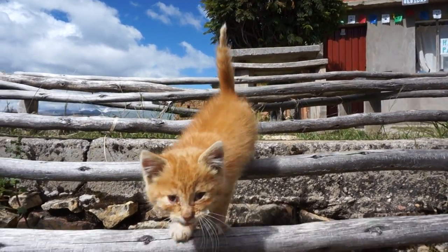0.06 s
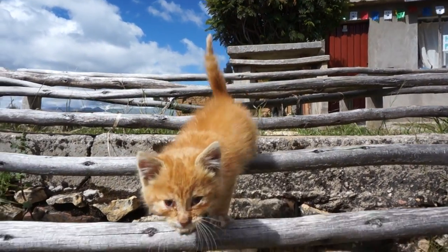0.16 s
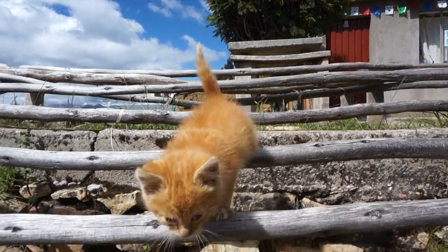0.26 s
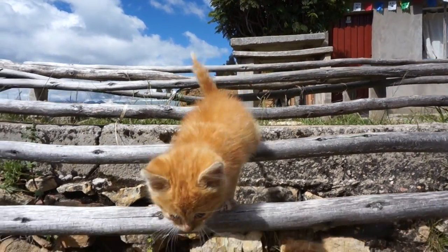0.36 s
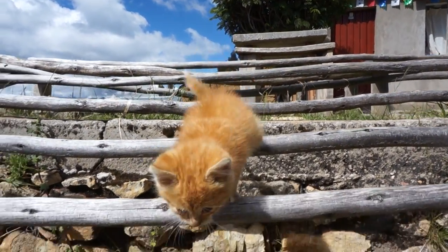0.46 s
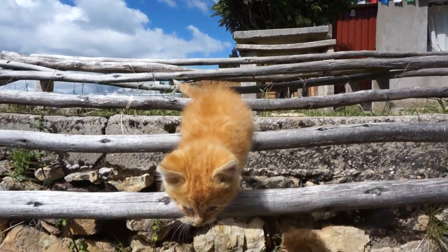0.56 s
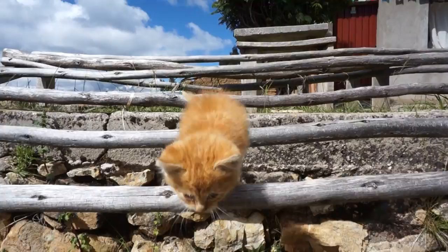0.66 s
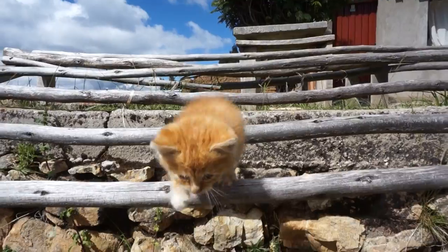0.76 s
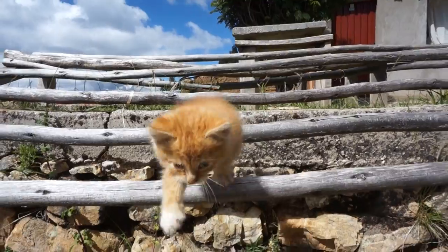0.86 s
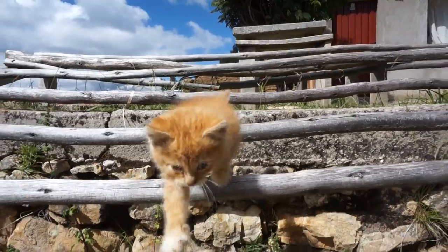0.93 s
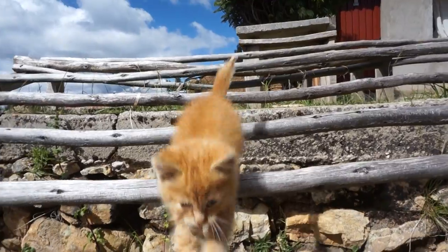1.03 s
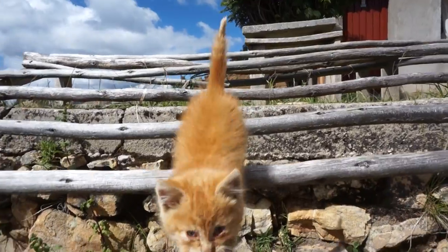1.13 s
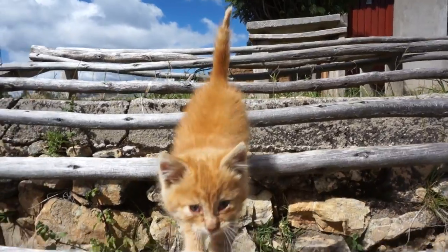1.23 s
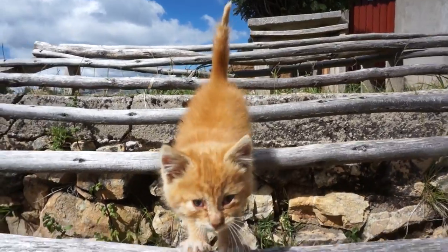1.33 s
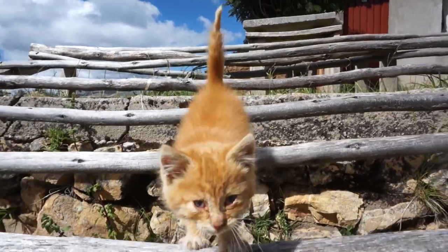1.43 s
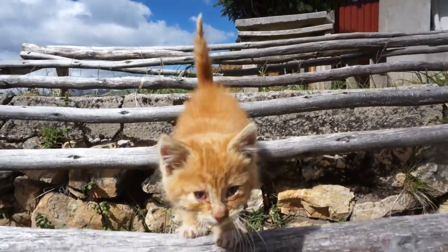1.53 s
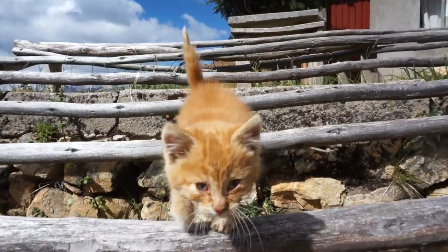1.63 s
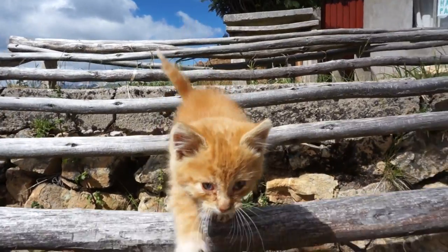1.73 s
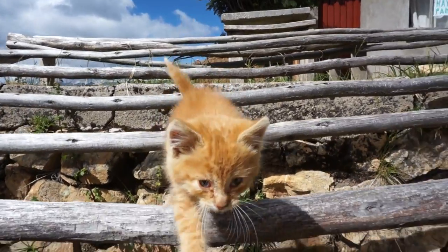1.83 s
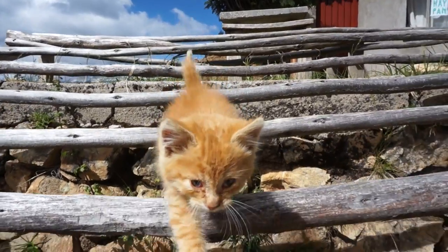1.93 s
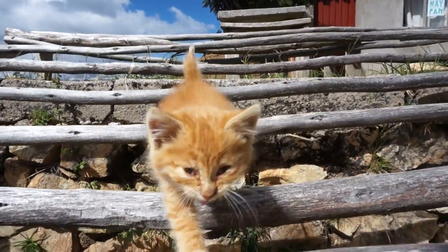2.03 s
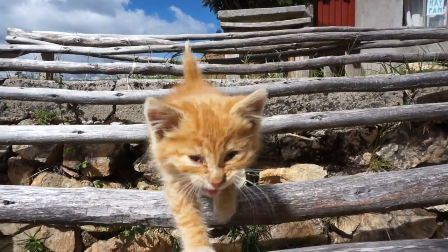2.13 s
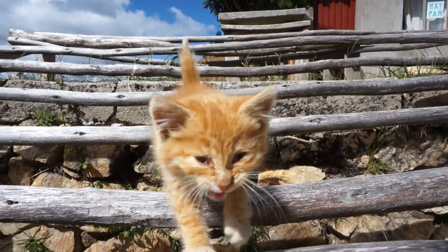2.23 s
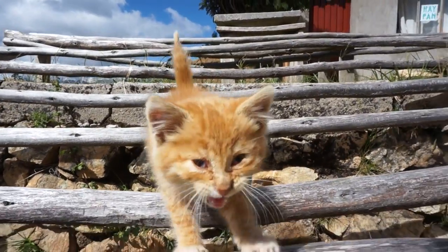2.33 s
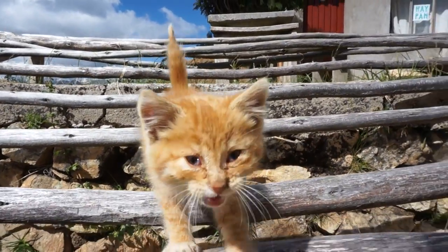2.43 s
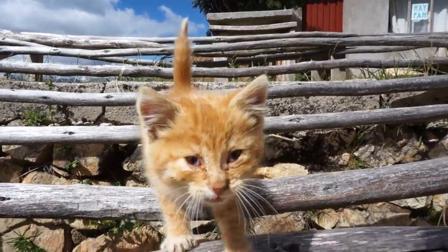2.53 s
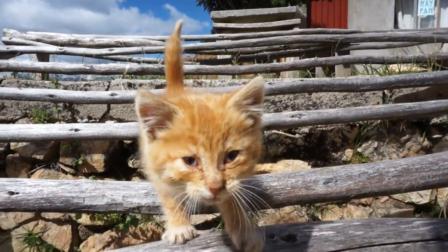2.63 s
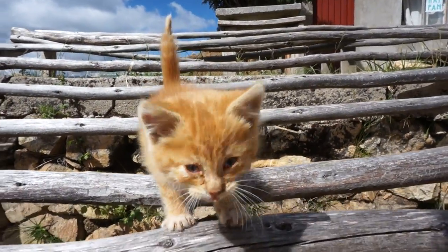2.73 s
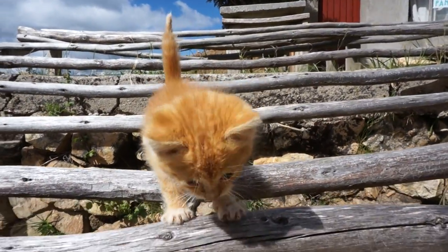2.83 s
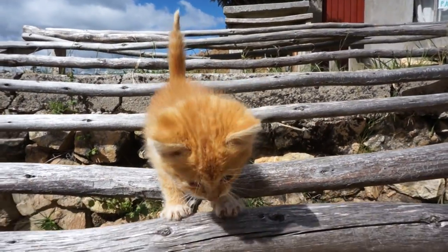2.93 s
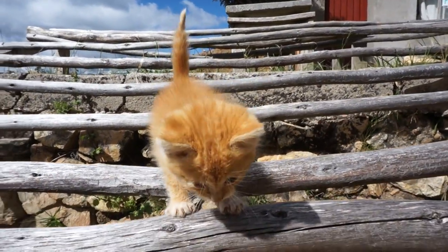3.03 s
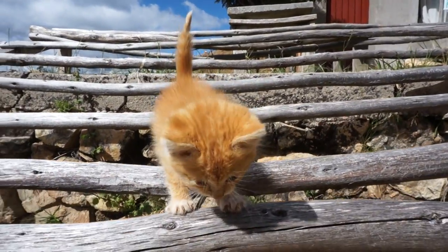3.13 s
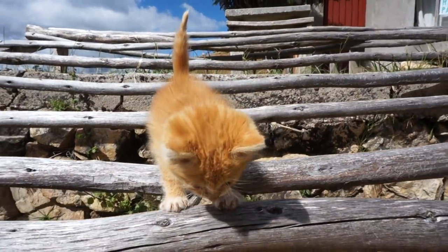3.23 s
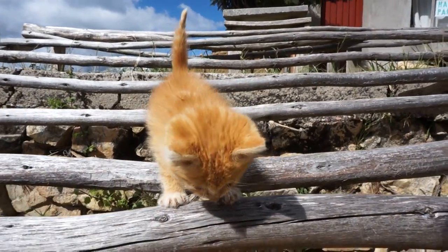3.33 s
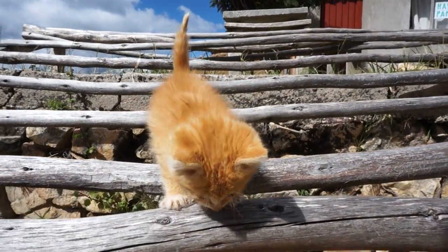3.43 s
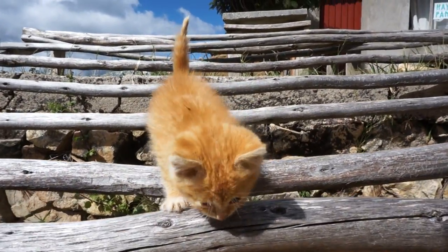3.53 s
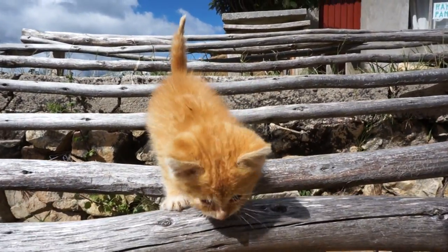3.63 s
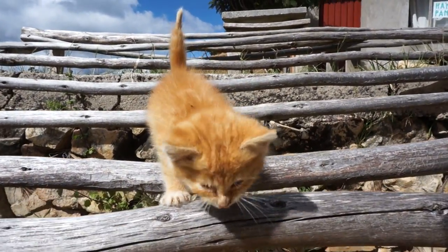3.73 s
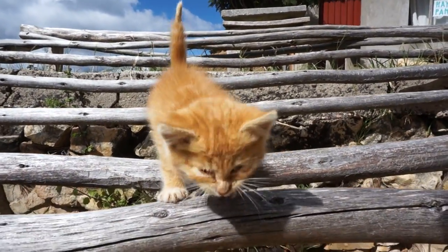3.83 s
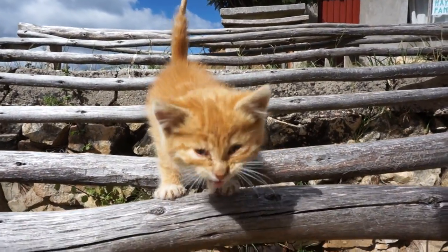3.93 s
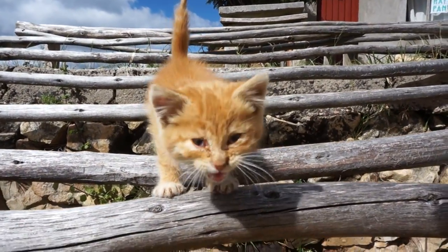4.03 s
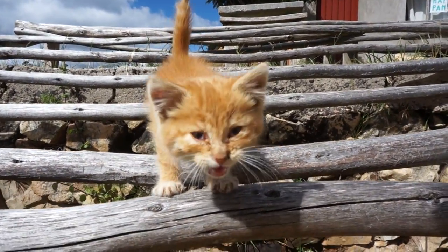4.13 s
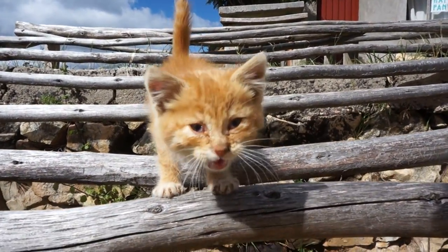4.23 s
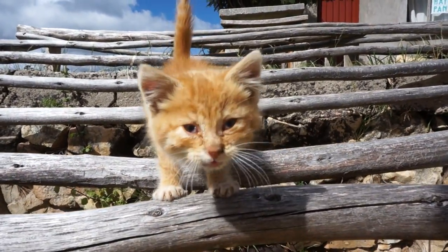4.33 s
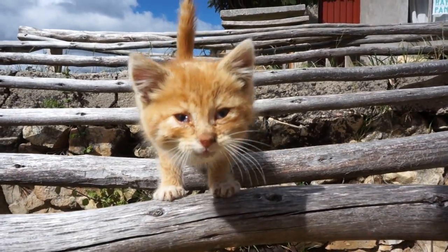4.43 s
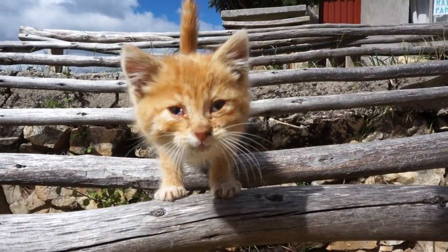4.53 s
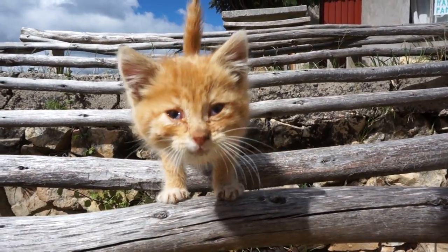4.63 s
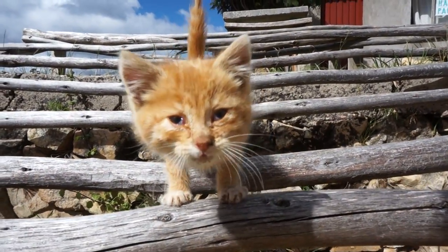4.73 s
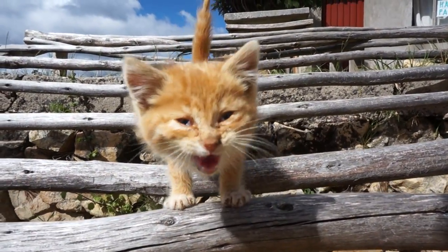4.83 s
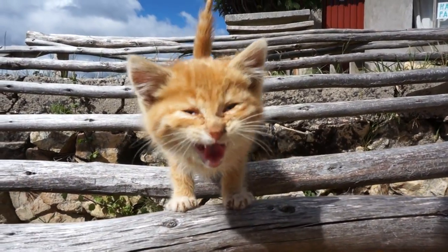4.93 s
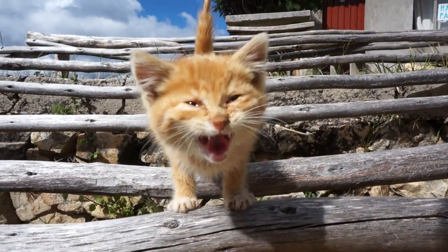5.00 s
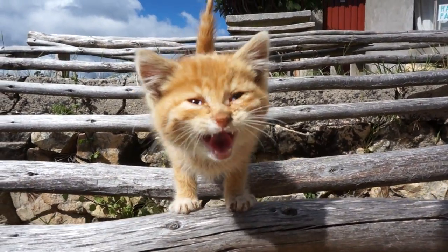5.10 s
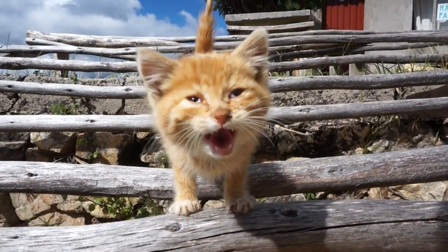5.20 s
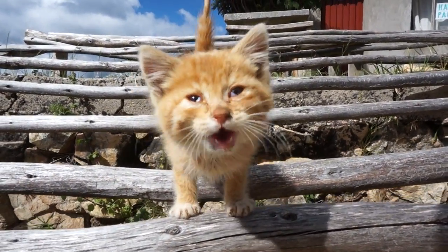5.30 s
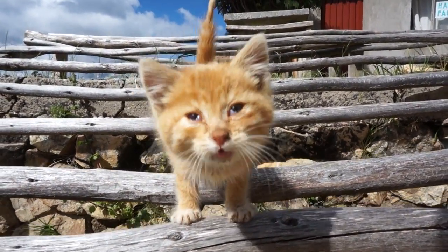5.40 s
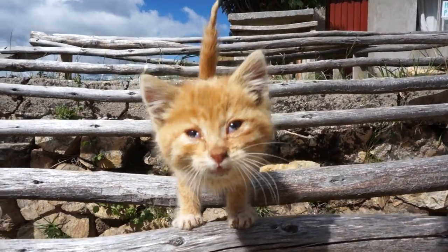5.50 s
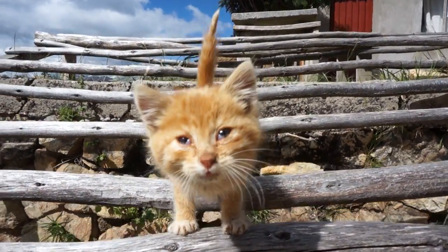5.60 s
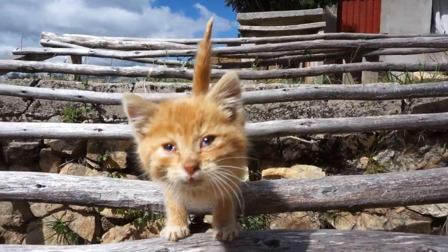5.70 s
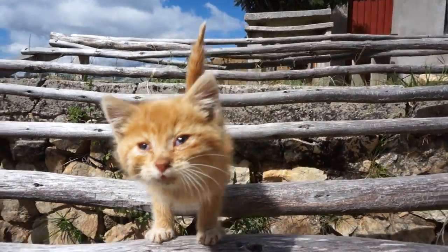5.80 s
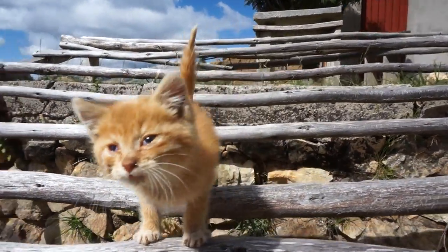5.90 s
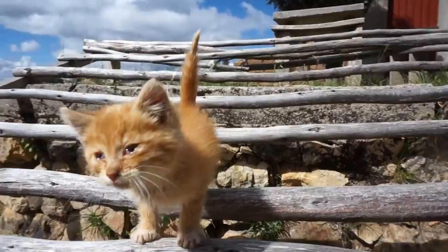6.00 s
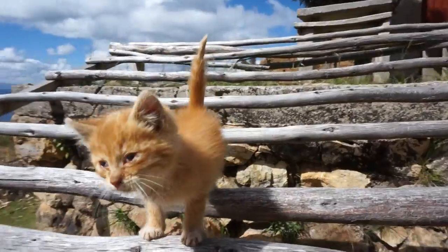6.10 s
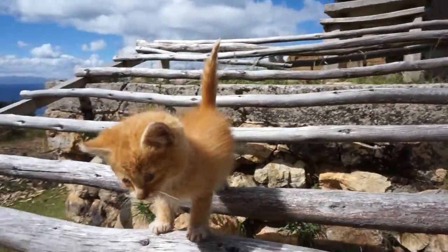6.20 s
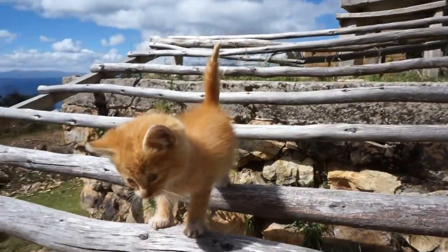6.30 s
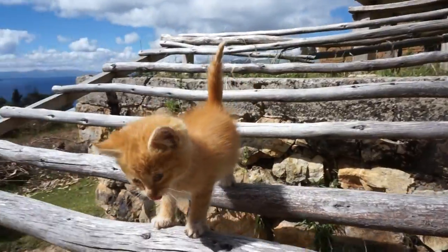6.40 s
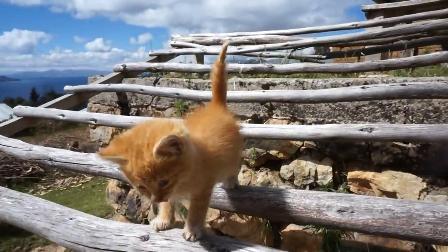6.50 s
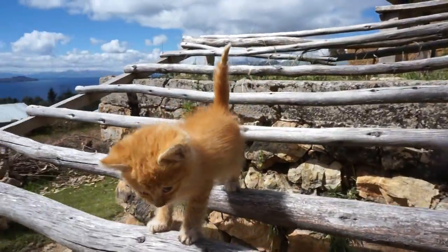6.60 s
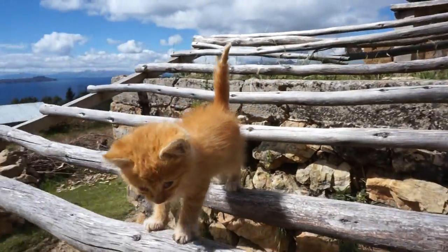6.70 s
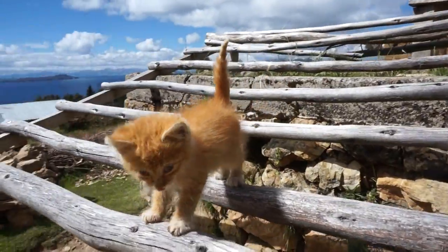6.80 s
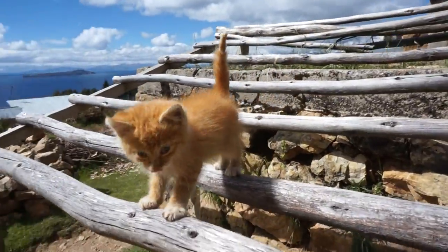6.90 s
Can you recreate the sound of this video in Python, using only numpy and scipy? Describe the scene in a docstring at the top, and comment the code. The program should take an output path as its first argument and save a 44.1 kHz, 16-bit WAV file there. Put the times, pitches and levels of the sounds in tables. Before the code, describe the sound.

A close outdoor scene with a quiet airy wash and steady fine microphone hiss. At 0 s the tail of a kitten's mew dies away. Low wind thumps hit the microphone from about 0.65 s, as a short high mew rises and falls until 0.97, ending in a small burst. Another gust follows at 1.1; dull knocks come near 1.25 and 1.45, with a faint run of falling bird chirps from 1.4 to 1.9. A longer, brighter mew arches from 2.0 to 2.5, followed by a firm double knock at 2.6 and another at 3.1. Wind flutters, then buffets strongly from 3.5 to 4.3. A tiny lip tick at 3.67 leads into a mew lasting to 4.3. The strongest mew runs from 4.83 to 5.38, starting hoarse and ending creaky. Then the wind drops; dull knocks at 5.6, 5.9, 6.15 and 6.75 and slight scuffs remain until about 7 s.

```python
"""Kitten on a fence

A kitten meows five times on a wooden fence outdoors, close to the microphone: harmonics and puffs
of air from the vocal folds excite resonances, and the pitch arches as the mouth opens and shuts.
Wind is filtered noise with pressure pulses, one of them a low thump; dull knocks, and bursts as two
meows end, are sums of decaying modes and noise. Shaped noise gives scuffs, an outdoor wash and
microphone hiss; a far bird whistles falling glides."""
import sys
import numpy as np
from scipy import signal
from scipy.fft import rfft, irfft, next_fast_len
from scipy.io import wavfile
from scipy.ndimage import uniform_filter1d

SR = 44100
rng = np.random.default_rng(int(sys.argv[2]) if len(sys.argv) > 2 else 0)


def unload_audio(sound):
    """Save the sound as a 16-bit wav file, at the path given as the first command line argument."""
    columns = np.transpose(np.atleast_2d(sound))
    # keep every value between -1 and 1, then stretch to whole-number steps
    steps = np.round(np.clip(columns, -1, 1) * 32767)
    wavfile.write(sys.argv[1], SR, steps.astype(np.int16))


N = 306495
TIME = np.arange(N) / SR
EDGE_HZ = 15900  # upper limit of the band

# Outdoor wash, spectrum: frequency_hz, relative_level_db
WASH_SPECTRUM = [(30, 2), (120, 0), (330, 4), (700, -2.5), (1200, -7), (2000, -13.5), (4000, -14.5),
                 (9000, -31), (16000, -58)]
# Outdoor wash, level about which it wavers: time_s, level_db
WASH_LEVEL = [(0, -54), (1.7, -54.5), (2.6, -49), (3.25, -55.5), (4.65, -57.5), (5.6, -52.5), (6.5, -54),
              (6.95, -53.5)]
# Microphone hiss, spectrum: frequency_hz, relative_level_db
HISS_SPECTRUM = [(300, -38), (2000, 5.5), (4600, -2.5), (5200, 13), (5900, 5.5), (9000, 5.5), (12300, 6),
                 (13000, 9), (13700, 5), (16000, 4.5)]

# Falling chirps of a far bird: start_s, level_db
CHIRPS = [(1.368, -61), (1.5, -58), (1.635, -58), (1.775, -57), (1.918, -65)]
CHIRP_START_HZ, CHIRP_END_HZ, CHIRP_S = 3950, 2950, .028

# Breeze and gusts, before lumpiness and a common trim: start_s, length_s, level_db
GUSTS = [(0, 5.3, -48), (0, 0.39, -38.5), (.65, .34, -25.5), (1.07, 0.13, -19.5), (1.26, 0.14, -30),
         (1.53, 0.21, -28), (1.8, 0.39, -34), (2.25, .4, -37), (2.72, 0.019, -33), (2.8, 0.019, -27.5),
         (2.92, 0.036, -25.5), (3.09, 0.045, -29), (3.37, 0.022, -30), (3.47, 0.19, -24),
         (3.75, 0.46, -26.5), (4.2, 0.24, -33), (4.8, 0.1, -31.5), (4.95, 0.31, -44), (5.3, 1.65, -64),
         (6.5, 0.025, -44.5), (6.78, .17, -65)]
GUST_RISE_S, GUST_FALL_S = 0.036, 0.018
# Wind rumble, spectrum: frequency_hz, relative_level_db
RUMBLE_SPECTRUM = [(15, -8), (35, -1.5), (70, 6), (115, 1), (190, -10), (300, -82), (500, -79),
                   (1000, -39.5), (3000, -74)]
# Higher flutter of strong gusts, spectrum: frequency_hz, relative_level_db
FLUTTER_SPECTRUM = [(60, -23), (170, 3.5), (280, -3), (450, -21.5), (900, -42), (3000, -80)]
# Strong eddies slapping the microphone, and at 5.917 a low thump, all before soft saturation:
# centre_s, peak_db, frequency_hz
BUFFETS = [(0.667, -15.5, 106), (0.75, -8.5, 143), (0.814, -5.5, 114), (1.095, -7.5, 160),
           (1.122, -7.5, 116), (1.654, -9.5, 98), (2.02, -14.5, 101), (2.164, -22, 105), (3.752, -7, 141),
           (3.911, -5, 102), (4.109, -10.5, 165), (4.263, -18, 128), (4.396, -20.5, 82),
           (4.839, -10.5, 107), (5.917, -26.5, 188)]
# Small random eddies: mean rate, peak over the gust level, and a reference frequency,
# from which they spread further down than up
EDDIES_PER_S, EDDY_DB, EDDY_HZ = 9.2, 6.5, 114
WIND_LIMIT = .33  # pressure at which the wind saturates softly

# Rustles of shoes and clothes, or scuffs on the ground, before graininess: start_s, length_s, level_db
SCUFFS = [(1.03, 0.025, -40), (1.1, .18, -50), (1.44, 0.055, -44.5), (2.37, 0.047, -38.5),
          (2.6, 0.009, -42), (6.14, 0.016, -42.5), (6.82, 0.11, -45)]
SCUFF_RISE_S, SCUFF_FALL_S = 0.031, 0.032
# Scuff noise, spectrum: frequency_hz, relative_level_db
SCUFF_SPECTRUM = [(120, -43), (200, -8.5), (262, -1.5), (570, -5), (696, -6), (912, -13), (1220, -6.5),
                  (2650, -21), (15000, -39)]

# Dull knocks of steps and handling; those at .955 and 5.39 are bursts as meows end.
# Levels are before a common trim: start_s, level_db, crack_relative_db
KNOCKS = [(0.955, -23.5, -9), (1.248, -40.5, 2.5), (1.288, -46, 3), (1.44, -24.5, -16.5),
          (1.488, -32.5, -27), (1.531, -36.5, -23), (2.584, -19, -27), (2.595, -18.5, -12.5),
          (3.082, -27, -21), (5.39, -35.5, -7), (5.623, -26.5, -1), (5.877, -31, -12),
          (6.145, -23.5, -12.5), (6.739, -35.5, -16), (6.772, -34.5, -20), (6.903, -41, -20)]
# Modes of the body, each detuned at random in every knock: nominal_frequency_hz, relative_level_db
KNOCK_MODES = [(230, -1.5), (370, 3), (520, 1), (760, 3), (1130, -0.5), (1450, -13)]
# Noise tail of the body, spectrum: frequency_hz, relative_level_db
KNOCK_TAIL_SPECTRUM = [(100, -61), (300, -10), (550, 2), (800, -6), (1200, 14), (1700, -15), (2500, -41),
                       (8000, -9)]
# Crack of a knock, spectrum: frequency_hz, relative_level_db
CRACK_SPECTRUM = [(800, -24), (1800, 6), (3000, 7), (4000, -3), (6500, -10), (15000, -25)]
KNOCK_T60_S = 0.045  # time for the modes to fall by 60 dB

# Meows: start_s, end_s, hoarse_onset_s, swell_s, swell_depth_db, fade_factor (mouth and upper rings),
# open_mouth_hz, upper_resonance_factor, then levels at the top of the arch:
# fundamental_db, throat_db, mouth_db, upper_db, sheen_db
MEOWS = [(-.2, 0.089, .04, .05, 0, 0.82, 3380, 0.96, -38, -34.5, -29.5, -35.5, -50),
         (.69, .968, 0.047, 0.034, 7, 1.05, 4260, 1, -40, -38, -33, -35.5, -44.5),
         (1.991, 2.533, 0.06, 0.13, 9.5, 0.25, 4650, 1, -32.5, -33.5, -28.5, -31.5, -35.5),
         (3.708, 4.305, 0.043, 0.29, 15.5, 1.42, 4460, .98, -33.5, -29.5, -28.5, -29, -41),
         (4.828, 5.381, 0.138, 0.26, -2, 0.98, 4800, 0.97, -33, -31.5, -24, -28.5, -34.5)]
# Arch of pitch, one curve a meow: time_s, pitch_hz
PITCHES = [
    [(0.0, 600), (0.034, 539), (0.07, 391.6), (0.085, 391)],
    [(0.7, 519), (0.728, 569), (0.74, 610), (0.772, 640), (0.826, 672.4), (0.882, 647), (0.962, 535)],
    [(2.0, 477), (2.028, 587), (2.052, 631), (2.146, 738.6), (2.19, 707), (2.324, 678), (2.44, 621),
     (2.462, 567), (2.498, 467), (2.522, 440)],
    [(3.71, 527), (3.716, 536), (3.744, 623), (3.814, 666), (3.894, 679.3), (4.04, 615), (4.216, 504.6),
     (4.244, 462), (4.266, 414.6), (4.284, 391)],
    [(4.85, 381.7), (4.88, 502.5), (4.92, 571), (5.018, 682), (5.102, 664), (5.268, 561), (5.322, 499),
     (5.342, 430), (5.348, 437), (5.364, 368.6)],
]
# Fixed throat resonances: frequency_hz, width_hz, relative_level_db
THROAT_MODES = [(1170, 520, 0), (2150, 380, -19)]
# Resonances that move with the mouth: factor_on_mouth_hz, width_hz, relative_level_db
MOUTH_MODES = [(0.931, 760, 19), (1.13, 820, 13.5)]
# Resonances that rise with the larynx: frequency_hz (at USUAL_HZ, factor 1), width_hz, relative_level_db
UPPER_MODES = [(5070, 700, 8), (6006, 720, 3)]
USUAL_HZ = 650  # reference pitch
# Fixed high sheen: frequency_hz, width_hz, relative_level_db
SHEEN_MODES = [(8870, 2050, 8.5), (10440, 2000, 4), (11200, 900, 3), (14200, 1100, -20)]
# Air noise in each ring before roughness adds more: throat_share, mouth_share, upper_share, sheen_share
AIR_SHARES = (.008, .035, .11, .32)
# Fades of fundamental, throat, mouth, upper and sheen: loss_db (one octave below the top pitch),
# bend_exponent, start_loss_db, end_loss_db
FADES = [(10.8, 0.66, 6, -1.5), (16, 1.03, 26, -0.5), (26.7, 1.7, 21, 12.5), (38.5, 2.06, 23, 36),
         (30.5, 0.73, 11, 8)]
ATTACK_S, RELEASE_S = 0.014, 0.026  # time constants of the start and end losses
EDGE_S = .005  # shortest start or stop of the voice
# Unsteadiness before roughness adds more: pitch_jitter_share, pitch_wobble_share, shimmer_share
UNSTEADY = (.0015, .004, .03)
UNEVEN_DB = .2  # slow unevenness per harmonic number, up to the 15th
# The throat is loudest where the second harmonic meets its resonance
THROAT_TUNED_HZ, THROAT_RANGE_HZ, THROAT_GAIN_DB = 579, 59.4, 7.5
# Mouth resonance when shut, exponent of its climb with pitch, its sinking in octaves a second
SHUT_HZ, MOUTH_STEEPNESS, JAW_CLOSING = 2830, 3.2, 0.42
# Roughness 0-1: of the clear voice, most added as it catches, most added as it creaks
CLEAR, ONSET_ROUGH, CREAK_ROUGH = .05, .5, .8
CREAK_HZ, CREAK_RANGE_HZ = 452.4, 26.5
# Brief cracks in the voice: time_s, added_roughness (0-1)
VOICE_CRACKS = [(4.14, 0.03), (4.929, 0.15)]
VOICE_CRACK_S = 0.0074
# Raspy starts of the meows: start_s, length_s, level_db
RASPS = [(0.647, 0.055, -36), (1.923, 0.095, -36), (3.623, 0.105, -37.5), (4.79, 0.065, -35.5)]
# Rasp noise, spectrum: frequency_hz, relative_level_db
RASP_SPECTRUM = [(200, 16.5), (500, 6.5), (1150, 3), (1800, -9.5), (3000, -15.5), (5000, -52), (14000, -49)]
# Soft click in the mouth that ends every meow, spectrum: frequency_hz, relative_level_db
END_CLICK_SPECTRUM = [(300, -11), (1100, -3), (2800, -17), (4200, 2), (6000, -12), (9500, -11),
                      (15000, -30)]
END_CLICK_DB, END_CLICK_S = -49, .018
# Wet double tick of parting lips: start_s, level_db, frequency_hz
LIP_TICKS = [(3.6705, -23.5, 9800), (3.672, -26, 11000)]


def gain_of(db):
    """Logarithmic level: decibels become an amplitude ratio."""
    return 10 ** (np.asarray(db) / 20)


def evened(x):
    """Normalisation: scales the signal to an rms of 1."""
    return x / np.sqrt(np.mean(x ** 2) + 1e-20)


def add(mix, s, sound):
    """Superposition: adds a sound to the mix in place, from time s."""
    part = mix[max(round(s * SR), 0):][:len(sound)]
    part += sound[:len(part)]


def coloured(x, points):
    """Linear filtering: weights the spectrum by (Hz, dB) points, at rms 1."""
    hz, db = np.transpose(points)
    size = next_fast_len(len(x))
    shape = np.interp(np.log(np.fft.rfftfreq(size, 1 / SR) + 1), np.log(hz), db)
    filtered = irfft(rfft(x, size) * gain_of(shape), size)
    return evened(filtered[:len(x)])


def noise(points, size):
    """Subtractive synthesis: white noise filtered to the given spectrum."""
    return coloured(rng.standard_normal(size), points)


def wander(rate_hz, size):
    """Random modulation: noise smoothed by a Gaussian low-pass of the given rate, at rms 1."""
    spectrum = rfft(rng.standard_normal(next_fast_len(size + SR)))
    hz = np.linspace(0, SR / 2, len(spectrum))
    return evened(irfft(spectrum * np.exp(-(hz / rate_hz) ** 2)))[:size]


def resonate(x, hz, width):
    """Resonance by frequency shifting: a two-pole low-pass moved to the curve hz, with peak gain 1."""
    turn = np.exp(2j * np.pi * np.cumsum(hz * np.ones(len(x))) / SR)
    r = np.exp(-np.pi * width / SR)
    shifted = signal.lfilter([(1 - r) ** 2], [1, -2 * r, r * r], x / turn)
    return 2 * (turn * shifted).real


def steady(x):
    """Automatic gain: division by the running rms holds the level at 1."""
    power = uniform_filter1d(uniform_filter1d(x ** 2, size=500), size=500)
    return x / np.sqrt(abs(power) + 1e-12)


def spread(mid, side, side_db):
    """Mid-side stereo: the side signal is added on the left and subtracted on the right."""
    return np.array([mid + gain_of(side_db) * side, mid - gain_of(side_db) * side])


def swells(rows, rise_s, fall_s):
    """Addition of powers: the joint level of events that each rise, hold and decay exponentially."""
    power = 0
    for s, length, db in rows:
        before = np.maximum(s - TIME, 0) / rise_s
        after = np.maximum(TIME - s - length, 0) / fall_s
        power = power + gain_of(db) ** 2 * np.exp(-2 * np.minimum(before + after, 20))
    return np.sqrt(power)


def air():
    """Diffuse noise: a slowly wavering wash from the surroundings with even microphone hiss."""
    wash_db = np.interp(TIME, *np.transpose(WASH_LEVEL)) + 1.3 * wander(9, N)
    wash = spread(noise(WASH_SPECTRUM, N), noise(WASH_SPECTRUM, N), side_db=-7.5)
    hiss = spread(noise(HISS_SPECTRUM, N), noise(HISS_SPECTRUM, N), side_db=-61)
    return wash * gain_of(wash_db) + gain_of(-59.5) * hiss


def bird():
    """Frequency glide: each chirp is a sine falling linearly in frequency."""
    out, size = np.zeros(N), round(CHIRP_S * SR)
    hz = np.linspace(CHIRP_START_HZ, CHIRP_END_HZ, size)
    chirp = np.sin(2 * np.pi * np.cumsum(hz) / SR) * signal.windows.tukey(size, .6)
    for s, db in CHIRPS:
        add(out, s, gain_of(db) * chirp)
    return out


def pressure_pulse(s, db, hz):
    """Pressure pulse: a push between two dips, centred on time s, with its spectral peak at hz."""
    t = TIME[:2048] - TIME[1024]
    u = (np.pi * hz * t) ** 2
    return s + t[0], gain_of(db) * (1 - 2 * u) * np.exp(-u)


def wind(lumpy_db=3.5, gust_db=-22, crossing_s=0.00079):
    """Turbulence: lumpy low noise, a flutter that grows with the gusts, eddy pulses and a low thump."""
    gusts = swells(GUSTS, GUST_RISE_S, GUST_FALL_S)
    level_db = 20 * np.log10(gusts)
    level = gusts * gain_of(lumpy_db * wander(33.0, N) + 0.46)
    force = gain_of(.5 * np.minimum(level_db - gust_db, 3))
    mid, side = (level * (noise(RUMBLE_SPECTRUM, N) + gain_of(-8) * force * noise(FLUTTER_SPECTRUM, N))
                 for _ in range(2))
    for row in BUFFETS:
        add(mid, *pressure_pulse(*row))
    for at in np.flatnonzero(rng.random(N) < EDDIES_PER_S / SR):
        eddy_hz = EDDY_HZ * 2 ** rng.uniform(-0.69, 0.35)
        add(mid, *pressure_pulse(TIME[at], level_db[at] + EDDY_DB, eddy_hz))
    mid = WIND_LIMIT * np.tanh(mid / WIND_LIMIT)
    # the eddies drift past the left port first, then the right
    ports = np.array([np.interp(TIME + way * crossing_s / 2, TIME, mid) for way in (1, -1)])
    return ports + spread(0, side, side_db=-10.0)


def scuff(grain_db=4):
    """Friction: coloured noise with a random grainy level rustles and rubs on the ground."""
    level = swells(SCUFFS, SCUFF_RISE_S, SCUFF_FALL_S) * gain_of(grain_db * wander(195, N) - 2.5)
    return level * spread(noise(SCUFF_SPECTRUM, N), noise(SCUFF_SPECTRUM, N), side_db=-13.5)


def knocks(attack_s=0.0014, tail_db=-19, tail_t60_s=0.078):
    """Modal decay: knocks, and bursts ending two meows, are detuned modes, a noise crack and a tail."""
    out, t = np.zeros(N), TIME[:8192]
    hz, mode_db = np.transpose(KNOCK_MODES)[:, :, None]
    for s, db, crack_db in KNOCKS:
        detune, phase = rng.random((2, len(hz), 1))
        mode_hz = hz * (.88 + .24 * detune)
        modes = gain_of(mode_db) * np.sin(2 * np.pi * (mode_hz * t + phase))
        ring = evened(modes.sum(0)) * gain_of(-60 * t / KNOCK_T60_S)
        tail = noise(KNOCK_TAIL_SPECTRUM, len(t)) * gain_of(tail_db - 60 * t / tail_t60_s)
        crack = noise(CRACK_SPECTRUM, len(t)) * gain_of(crack_db - 60 * t / (0.58 * KNOCK_T60_S))
        add(out, s, gain_of(db - 1.0) * (ring + tail + crack) * np.minimum(t / attack_s, 1))
    return spread(out, np.roll(out, shift=30), side_db=-19.0)


def hoarseness(t, hz, start, onset_s):
    """Irregular vibration: the voice catches at the start, may crack, and creaks at low pitch."""
    creak = CREAK_ROUGH / (1 + np.exp((hz - CREAK_HZ) / CREAK_RANGE_HZ))
    catch = ONSET_ROUGH * np.exp(-((t - start) / onset_s) ** 2)
    cracks = sum(amount * np.exp(-((t - s) / VOICE_CRACK_S) ** 2) for s, amount in VOICE_CRACKS)
    return np.clip(CLEAR + np.maximum(creak, catch) + cracks, 0, 1)


def folds(hz, rough, rough_jitter=0.046, rough_shimmer=0.66):
    """Quasi-periodic vibration: cycles of the folds, their strength, and a puff of air with each."""
    size = len(hz)
    jitter, wobble, shimmer = UNSTEADY
    drift = (jitter + rough_jitter * rough) * wander(204, size) + wobble * wander(38.4, size)
    turns = np.cumsum(hz * (1 + drift)) / SR
    strength = 1 + (shimmer + rough_shimmer * rough) * wander(112, size)
    puffs = evened((0.38 + np.exp(-(turns % 1) / 0.071)) * rng.standard_normal(size))
    return turns, strength, puffs


def harmonic_series(t, hz, turns, strength, k):
    """Fourier series: complex harmonics numbered k within the band, with slowly drifting strengths."""
    harmonics = strength * np.exp(2j * np.pi * k * turns) * (k * hz < EDGE_HZ)
    knots = TIME[::3500]
    uneven = np.array([np.interp(t, knots, rng.standard_normal(len(knots))) for _ in k])
    return harmonics * gain_of(UNEVEN_DB * np.minimum(k, 15) * uneven)


def rail_echo(t, harmonic_hz):
    """Comb interference: the rail below throws treble back; notches shift as the head moves."""
    delay_s = .00055 * (1 + .2 * wander(3, len(t)))
    echo = .5 * np.minimum(harmonic_hz / 5500, 1) ** 2
    return (1 + echo * np.exp(-2j * np.pi * harmonic_hz * delay_s)) / np.sqrt(1 + echo ** 2)


def ring_levels(t, hz, start, end, swell_s, swell_db, fade, top_dbs):
    """Level follows pitch: each ring sets in, fades below the arch's top and stops; two have a swell."""
    octaves_down = np.log2(hz.max() / hz)
    opening, closing = np.exp(-(t - start) / ATTACK_S), np.exp(-(end - t) / RELEASE_S)
    low, throat, mouth, upper, sheen = (
        db - factor * loss_db * octaves_down ** bend - start_db * opening - end_db * closing
        for db, factor, (loss_db, bend, start_db, end_db) in zip(top_dbs, (1, 1, fade, fade, 1), FADES))
    tuned = THROAT_GAIN_DB * np.exp(-((hz - THROAT_TUNED_HZ) / THROAT_RANGE_HZ) ** 2)
    unopened = swell_db * np.maximum(1 - (t - start) / swell_s, 0)
    return low, throat + tuned, mouth - unopened, upper - unopened, sheen


def meow(pitch, row, hoarse_air=0.6, larynx=0.42):
    """Source and filter: fold harmonics and air excite the throat, moving mouth, upper ring and sheen."""
    start, end, onset_s, swell_s, swell_db, fade, open_hz, upper_factor, *top_dbs = row
    t = np.arange(max(start, 0), end, 1 / SR)
    hz = uniform_filter1d(np.interp(t, *np.transpose(pitch)), size=500, mode="nearest")
    rough = hoarseness(t, hz, start, onset_s)
    turns, strength, puffs = folds(hz, rough)
    k = np.arange(2, 29)[:, None]
    harmonics = harmonic_series(t, hz, turns, strength, k) * rail_echo(t, k * hz)

    low_db, *levels_db = ring_levels(t, hz, start, end, swell_s, swell_db, fade, top_dbs)
    opened_hz = SHUT_HZ + (open_hz - SHUT_HZ) * (hz / hz.max()) ** MOUTH_STEEPNESS
    mouth_hz = opened_hz * 2 ** (JAW_CLOSING * (t[hz.argmax()] - t))
    rise = upper_factor * (hz / USUAL_HZ) ** larynx  # a raised larynx shortens the throat
    rings = [THROAT_MODES,
             [(factor * mouth_hz, width, db) for factor, width, db in MOUTH_MODES],
             [(f * rise, width, db) for f, width, db in UPPER_MODES],
             SHEEN_MODES]
    power, lag, hiss = 0, 0, 0
    for level_db, modes, air_share in zip(levels_db, rings, AIR_SHARES):
        share = np.clip(air_share + hoarse_air * rough, 0, .95)
        offsets = [(2 * (k * hz - f) / width, db) for f, width, db in modes]
        shape = sum((gain_of(db) / (1 + u * u)) ** 2 for u, db in offsets)
        power = power + gain_of(level_db) ** 2 * (1 - share ** 2) * shape / shape.sum(0)
        # each resonance smears the pulse a little
        lag = lag + sum(np.arctan(u) + np.pi / 2 for u, db in offsets)
        airy = sum(gain_of(db) * resonate(puffs, f, width) for f, width, db in modes)
        hiss = hiss + gain_of(level_db) * share * steady(airy)
    overtones = (np.sqrt(power) * harmonics * np.exp(-1j * lag / np.pi)).real.sum(0)
    tone = overtones + gain_of(low_db) * np.cos(2 * np.pi * turns)
    edges = np.clip(np.minimum(t - t[0], t[-1] - t) / EDGE_S, 0, 1)
    return t[0], (hiss - np.sqrt(2) * tone) * edges  # root 2 turns rms into peak amplitude


def kitten(tick_decay_s=0.0011):
    """Voiced and transient sources: meows, raspy starts, closing clicks and a double tick of the lips."""
    out = np.zeros(N)
    for pitch, row in zip(PITCHES, MEOWS):
        add(out, *meow(pitch, row))
        size = round(END_CLICK_S * SR)
        click = noise(END_CLICK_SPECTRUM, size) * np.hanning(size)
        add(out, row[1] - END_CLICK_S / 2, gain_of(END_CLICK_DB) * click)
    for s, length, db in RASPS:
        size = round(length * SR)
        add(out, s, gain_of(db) * noise(RASP_SPECTRUM, size) * signal.windows.tukey(size, .3))
    t = TIME[:512]
    for s, db, hz in LIP_TICKS:
        add(out, s, gain_of(db) * np.sin(2 * np.pi * hz * t) * np.exp(-t / tick_decay_s))
    # the two microphone ports hear the voice slightly out of phase
    return spread(out, signal.hilbert(out).imag, side_db=-19.0)


def scene():
    """Superposition: surroundings, bird, wind, scuffs, knocks and kitten add at the microphone."""
    return air() + bird() + wind() + scuff() + knocks() + kitten()


def record(dry):
    """Band limitation: a linear-phase low-pass filter sets the recorder's upper limit."""
    low_pass = signal.firwin(511, EDGE_HZ, window=("kaiser", 9), fs=SR)
    return signal.oaconvolve(dry, low_pass[None], "same")


dry = scene()
out = record(dry)
unload_audio(out)
```